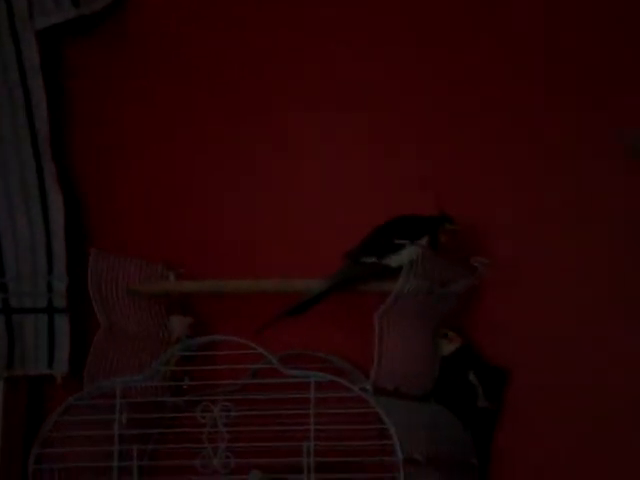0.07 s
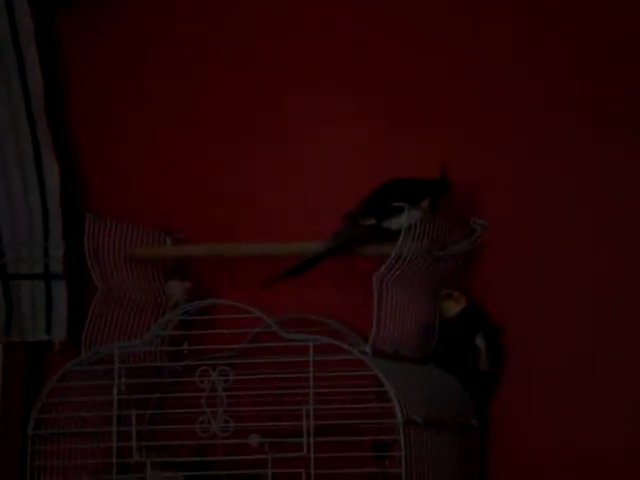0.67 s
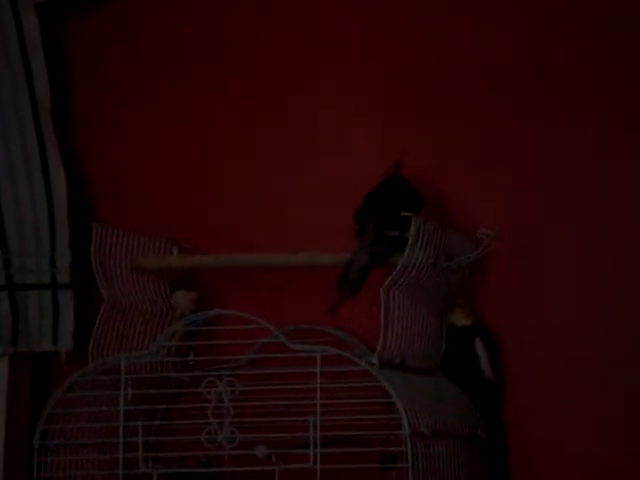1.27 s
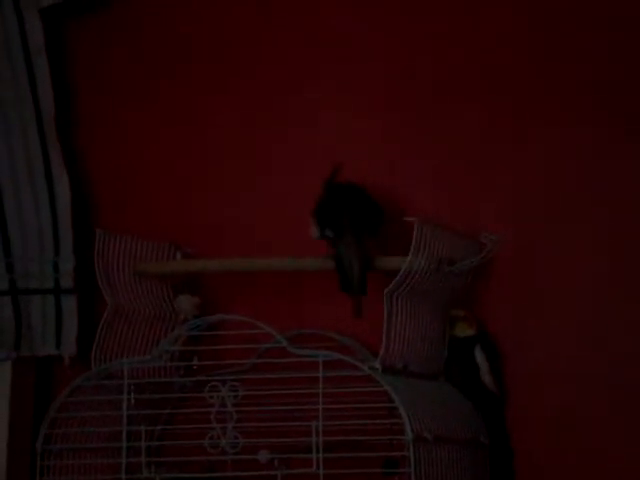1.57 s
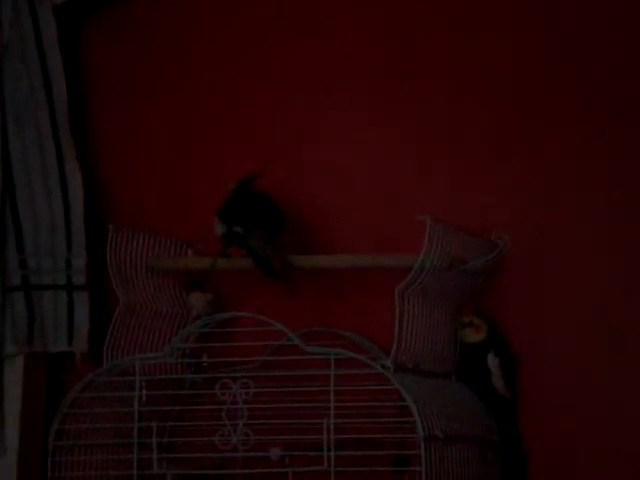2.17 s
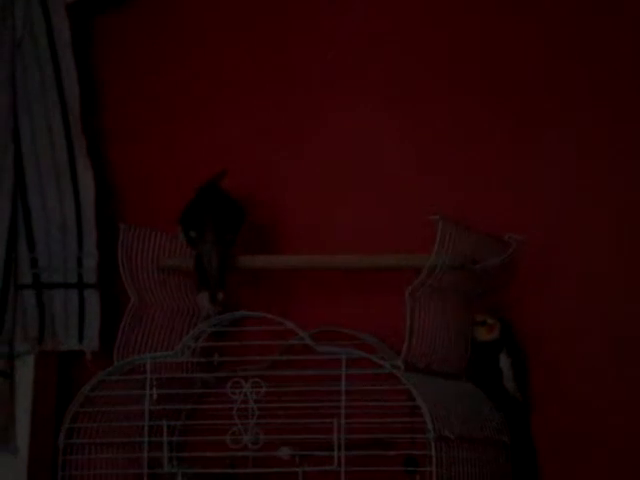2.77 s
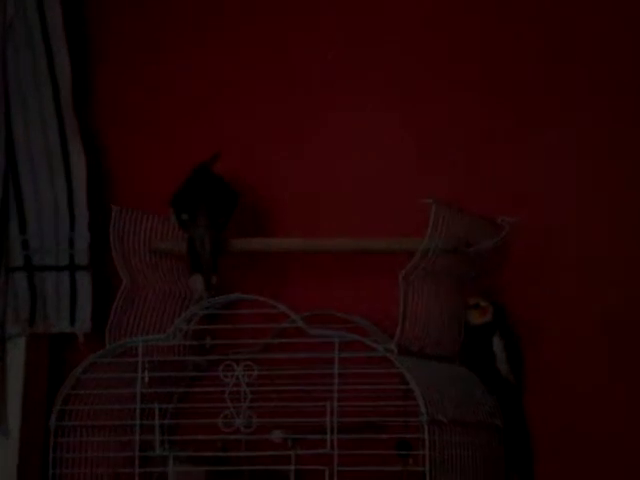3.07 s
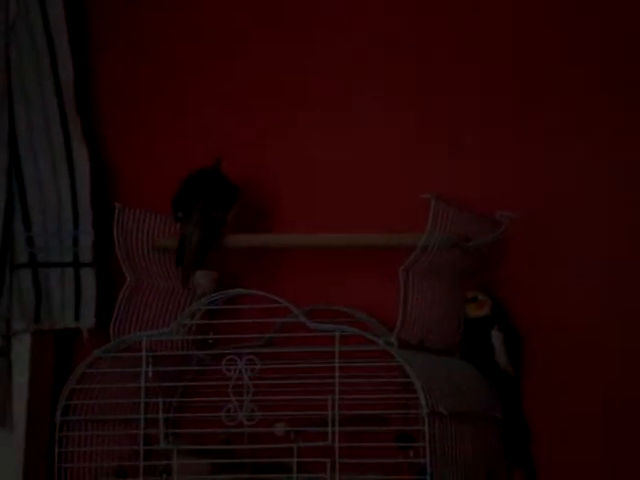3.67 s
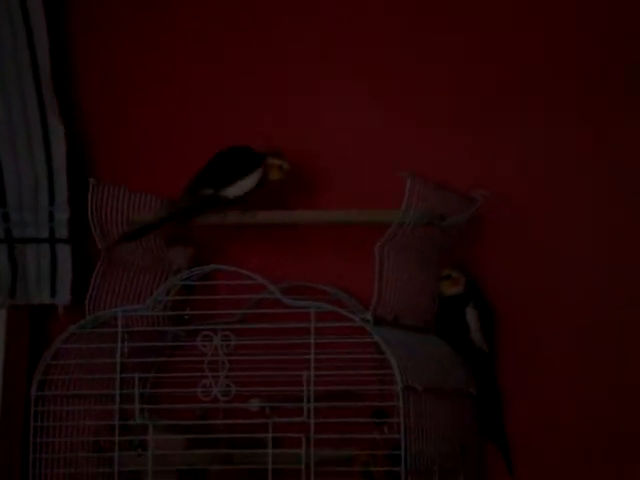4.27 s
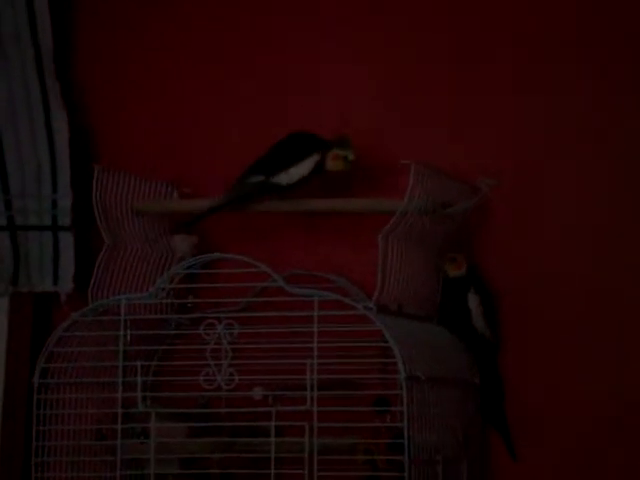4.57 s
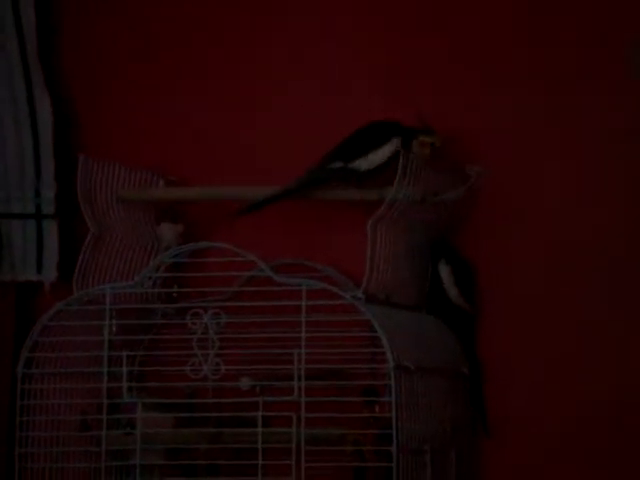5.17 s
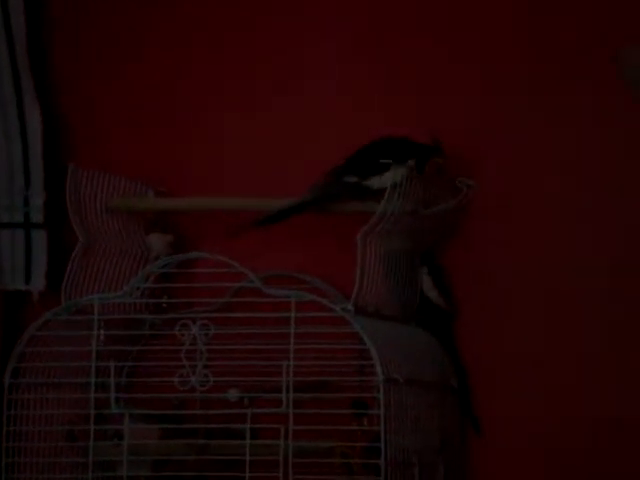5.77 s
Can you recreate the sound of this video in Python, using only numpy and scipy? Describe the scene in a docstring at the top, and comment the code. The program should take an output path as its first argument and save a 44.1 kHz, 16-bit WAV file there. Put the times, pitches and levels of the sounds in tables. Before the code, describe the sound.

A cockatiel scolds in a small quiet room over a low, steady hiss. The raspy tail of a squawk dies away at the start. Short harsh squawks come at about 0.2 and 0.7 seconds, with a quick chirp between them. From 1.4 to 4 seconds the squawks repeat unevenly, often in pairs, each lasting one or two tenths of a second, some tightening into a brief whistle. Feet and feathers scuff softly here and there. At about 4.1 seconds comes the loudest sound, a strained screech that climbs, sinks, climbs again and breaks off downward by 4.5 seconds, briefly overloading the microphone. A chirp follows at 4.7 seconds, a double squawk around 5, another chirp at 5.4 and a last squawk at 5.6. A very faint low hum rises in pitch over the final half second.

```python
"""A cockatiel scolds in short harsh squawks, sidling along its perch in a small quiet room.
Chaotic pulses of its syrinx ring the windpipe and beak; now and then the syrinx locks into a whistle.
Three chirps and one loud screech come between, the screech overloading the microphone.
A squawk's raspy tail dies away at the start; then feet and feathers scuff softly over a low room hiss.
A faint hum rises near the end."""
import sys
import numpy as np
from scipy import signal
from scipy.fft import rfft, irfft, next_fast_len
from scipy.io import wavfile
from scipy.ndimage import uniform_filter1d

SR = 44100
rng = np.random.default_rng(int(sys.argv[2]) if len(sys.argv) > 2 else 0)


def transcribe(signal):
    """Save signal, clipped to [-1, 1], as a 16-bit WAV file at the path in sys.argv[1]."""
    frames = np.atleast_2d(signal).T
    limited = np.clip(frames, -1, 1)
    pcm = np.round(limited * 32767).astype(np.int16)
    wavfile.write(sys.argv[1], SR, pcm)


N = 261072

# syrinx locked within a squawk: t/s, length/s, mid pitch/Hz, drop at ends/fraction, glide/fraction,
# fundamental/dB, overtones/dB
WHISTLES = [ (.185, .08, 1951, .02, -0.035, -35, -35), (1.41, .078, 2070, .14, -.08, -36, -27.5),
            (1.515, .104, 1615, .16, .07, -35.5, -30.5),
            (2.425, 0.047, 1520, -0.027, -0.0595, -32.5, -32.5), (2.47, 0.0482, 1630, .04, 0.037, -28, -28),
            (2.869, 0.0895, 1305, -.04, -0.094, -35.5, -44.5),
            (3.343, 0.0332, 1348, -0.067, -0.029, -30.5, -44), (3.372, .048, 1533, .11, -0.049, -33, -38.5),
            (3.885, 0.0998, 1480, -.03, .16, -37.5, -45), (5.01, 0.114, 1690, 0, -0.0034, -52.5, -33.5),
            (5.118, 0.0851, 1574, -.01, 0.0625, -30, -32.5), (5.613, 0.047, 1850, 0, -.01, -45.5, -31.5)]
# half-open beak, overtone response: f/Hz, gain/dB
HALF_OPEN_BEAK = [(2500, 9), (3300, 3), (4100, 2.5), (4900, 5), (5700, -6), (6600, -1.5), (7500, -12),
                  (9500, -25.5)]


def gain_of(db):
    """Decibels to amplitude."""
    return 10 ** (np.asarray(db) / 20)


def unit_rms(x):
    """Scale to rms 1."""
    return x / np.sqrt(np.mean(x ** 2) + 1e-20)


def lookup(points, hz):
    """Interpolate a table over log frequency."""
    f, value = np.transpose(points)
    return np.interp(np.log(hz + 1), np.log(f + 1), value)


def add(mix, start_s, sound):
    """Mix a sound in at start_s."""
    part = mix[max(round(start_s * SR), 0):][:len(sound)]
    part += sound[:len(part)]


def span(start_s, length_s):
    """Sample times and progress 0-1."""
    t = np.arange(0, length_s, 1 / SR)
    return start_s + t, t / length_s


def shaped(x, gain):
    """Filter by gain(f); rms 1."""
    size = next_fast_len(2 * len(x))
    spectrum = rfft(x, size) * gain(np.fft.rfftfreq(size, 1 / SR) + 1)
    return unit_rms(irfft(spectrum, size)[:len(x)])


def below(f, edge_hz):
    """Steep low-pass gain."""
    return 1 / (1 + (f / edge_hz) ** 20)


def wobble(count, rate_hz):
    """Smooth noise up to rate_hz; rms 1."""
    return shaped(rng.standard_normal(count), lambda f: 1 / (1 + (f / rate_hz) ** 4))


def fades(t, edge_s):
    """Linear ramps at both ends."""
    return np.clip(np.minimum(t - t[0], t[-1] - t) / edge_s, 0, 1)


def resonate(x, hz, width_hz):
    """Resonance tracking the curve hz."""
    carrier = np.exp(2j * np.pi * np.cumsum(hz) / SR)
    pole = np.exp(-np.pi * width_hz / SR)
    return 2 * (carrier * signal.lfilter([1 - pole], [1, -pole], x / carrier)).real


def hiss(level_db=-55.4, drift_db=1.54):
    """Room and microphone noise, drifting slightly in level."""
    # noise spectrum: f/Hz, relative level/dB
    spectrum = [(15, -55.5), (25, -19.5), (85, -13.5), (190, -4), (663, 0), (1300, -4), (1590, -6),
                (2040, -7.5), (2320, -9), (2980, -9), (3550, -12.5), (3920, -13.5), (4330, -13),
                (5420, -12.5), (9890, -15), (12900, -51.5), (21800, -120)]
    noise = shaped(rng.standard_normal(N), lambda f: gain_of(lookup(spectrum, f)))
    return gain_of(level_db + drift_db * wobble(N, 3.4)) * noise


def room(x, wet_db=-7.0, build_s=0.0044):
    """Direct sound, wall echoes and a short tail whose treble dies first."""
    # reverberation time: f/Hz, t60/s
    decay = [(300, 0.5), (2000, 0.2884), (4000, 0.3384), (8000, 0.204)]
    # wall echoes: delay/s, relative gain
    walls = [(.0023, -0.012), (.0052, -0.027), (.0094, 0.174), (0.0135, 0.21), (0.0227, 0.195)]
    hz, t, bins = signal.stft(rng.standard_normal(SR // 2), SR, nperseg=256)
    tail = signal.istft(bins * gain_of(-60 * t / lookup(decay, hz)[:, None]), SR, nperseg=256)[1]
    tail *= 1 - np.exp(-np.arange(len(tail)) / SR / build_s)
    response = gain_of(wet_db) * tail / np.linalg.norm(tail)
    direct = (0.00016, 0.876)
    for delay_s, gain in [direct] + walls:
        add(response, delay_s, np.array([gain]))
    return signal.fftconvolve(x, response / np.linalg.norm(response))[:N]


def hum(mix):
    """Faint low tone and its octave, drifting upward."""
    # tone: t/s, length/s, mid pitch/Hz, glide/fraction, level/dB
    note = (5.5, .5, 228.5, 0.23, -64)
    start_s, length_s, hz, glide, level_db = note
    t, u = span(start_s, length_s)
    pitch_hz = hz * (1 + glide * (u - .5) + .015 * wobble(len(t), 9.5))
    phase = 2 * np.pi * np.cumsum(pitch_hz) / SR
    tone = np.sin(phase) + 0.42 * np.sin(2 * phase)
    add(mix, start_s, gain_of(level_db) * tone * fades(t, 0.041))


def squawk_tail_and_scuffs(mix, grain_db=1.5, rise=0.099):
    """A squawk's raspy tail dying away at the start, then soft scuffs of feet and feathers."""
    # grainy noise bursts: t/s, decay time/s, level/dB, centre/Hz, width/octaves
    bursts = [(0, 0.031, -38.5, 2283, 0.743), (0.021, 0.226, -50.5, 2040, 0.457),
              (0.02, 0.228, -46, 516, 0.875), (0.035, 0.257, -57.5, 223.5, 0.226),
              (0.168, 0.192, -51.5, 584.6, 0.083), (0.44, 0.035, -56, 295.6, 0.54),
              (0.741, 0.0558, -49.5, 389.6, 0.25), (0.9, 0.058, -47, 1227, 0.36),
              (1.132, 0.0342, -43.5, 972, 1.18), (1.135, 0.0384, -49, 393, 0.264),
              (1.232, 0.0228, -51.5, 503, 0.93), (1.887, 0.0713, -47, 376.6, 0.391),
              (2.33, 0.0823, -56, 269, 0.846), (3.038, 0.1032, -45.5, 2714, 1.28),
              (3.457, 0.211, -50, 2847, 1.154), (3.511, 0.041, -46.5, 2000, 1.48),
              (5.071, 0.287, -60.5, 282, 0.507), (5.835, 0.07, -54, 3040, 2.2)]
    for start_s, decay_s, level_db, hz, octaves in bursts:
        t = np.arange(0, 1.3 * decay_s, 1 / SR)
        grains = rng.standard_normal(len(t)) * gain_of(grain_db * wobble(len(t), 150))
        band = shaped(
            grains, lambda f: np.exp(-.5 * (np.log2(f / hz) / octaves) ** 2) * np.sqrt(hz / (f + hz)))
        envelope = fades(t, rise * decay_s) * np.exp(-(t / decay_s) ** 3)
        add(mix, start_s, gain_of(level_db) * band * envelope)


def syrinx_tone(t, hz, first_db, upper_db, beak, jitter, shimmer_db, fuzz_db, octave_db, trim_db):
    """The syrinx swings at one trembling pitch; higher harmonics fray more."""
    count = len(t)
    # the tone roughens as the bird pushes
    strain = gain_of(0.33 * (first_db - first_db.max()))
    phase = 2 * np.pi * np.cumsum(hz * (1 + jitter * strain * wobble(count, 350))) / SR
    tone = np.zeros(count)
    for k in range(1, 6):
        level_db = first_db if k == 1 else upper_db + octave_db * np.log2(k - 1) + lookup(beak, k * hz)
        fuzz, fray_hz = gain_of(fuzz_db) * strain * k, 380 * np.sqrt(k)
        harmonic = (1 + fuzz * wobble(count, fray_hz)) * np.sin(k * phase)
        harmonic += fuzz * wobble(count, fray_hz) * np.cos(k * phase)
        tone += gain_of(level_db) * unit_rms(harmonic)
    return gain_of(trim_db + shimmer_db * wobble(count, 170)) * tone * fades(t, 0.00432)


def chirps(mix, sag_hz_per_s=2670, fade_db_per_s=194.5):
    """Short syrinx notes that start strong, then sag and fade."""
    # chirps: t/s, length/s, start pitch/Hz, fundamental/dB, overtones/dB
    notes = [(.492, 0.0317, 2009, -30.5, -30.5), (4.732, 0.0268, 2031, -29, -32),
             (5.432, 0.0273, 1960, -30, -33.5)]
    for start_s, length_s, hz, first_db, upper_db in notes:
        t, _ = span(start_s, length_s)
        pitch_hz = hz - sag_hz_per_s * (t - start_s)
        fade_db = fade_db_per_s * (t - start_s)
        tone = syrinx_tone(t, pitch_hz, first_db - fade_db, upper_db - fade_db, HALF_OPEN_BEAK,
                           jitter=.025, shimmer_db=4.0, fuzz_db=-16.5, octave_db=-12, trim_db=-2.2)
        add(mix, start_s, tone)


def screech(mix):
    """Strained cry through the wide-open beak: climbs, sinks, climbs, breaks off downward."""
    # cry contour: t/s, pitch/Hz, fundamental/dB, overtones/dB
    contour = [(4.136, 1410, -37.5, -35), (4.185, 1746, -22.5, -25), (4.207, 1915, -17, -22.5),
               (4.24, 2257, -18, -29), (4.25, 2512, -11.3, -21), (4.268, 2440, -13.4, -22.8),
               (4.286, 2080, -18.3, -26), (4.32, 1875, -21, -26), (4.374, 2085, -27.5, -34.5),
               (4.405, 1869, -23, -20), (4.428, 1987, -18, -34.5), (4.44, 2259, -22.5, -23),
               (4.462, 2340, -16, -22.5), (4.473, 1800, -19, -13.8), (4.481, 1550, -27, -19)]
    # wide-open beak, overtone response: f/Hz, gain/dB
    wide_open_beak = [(2800, 1), (3700, 0.5), (4600, 3), (5300, -2.5), (6100, -2.5), (7100, -15),
                      (8200, -8.5), (9500, -35.5)]
    times_s, *columns = np.transpose(contour)
    t = np.arange(times_s[0], times_s[-1], 1 / SR)
    pitch_hz, first_db, upper_db = (np.interp(t, times_s, column) for column in columns)
    tone = syrinx_tone(t, pitch_hz, first_db, upper_db, wide_open_beak,
                       jitter=.032, shimmer_db=1.3939, fuzz_db=-13.7, octave_db=-3.3, trim_db=-1.7)
    add(mix, t[0], tone)


def whistles(mix, waver=.008):
    """The locked syrinx arches, glides and wavers in pitch; weaker and duller at the ends."""
    for start_s, length_s, hz, arch, glide, first_db, upper_db in WHISTLES:
        t, u = span(start_s, length_s)
        ends = (2 * u - 1) ** 2
        pitch_hz = hz * (1 - arch * ends + glide * (u - .5) + waver * wobble(len(t), 45.43))
        tone = syrinx_tone(t, pitch_hz, first_db - 3 * ends, upper_db - 11 * ends, HALF_OPEN_BEAK,
                           jitter=0.02257, shimmer_db=2.5, fuzz_db=-19.5, octave_db=-5, trim_db=-2.5)
        add(mix, start_s, tone)


def locking(t, grip_s=0.0227):
    """Syrinx state: 0 rattling freely, 1 holding a pitch."""
    held = sum(np.clip(np.minimum(t - start_s, start_s + length_s - t) / grip_s, 0, 1)
               for start_s, length_s, *_ in WHISTLES)
    return np.minimum(held, 1)


def syrinx_rattle(count, rate_hz=1150, jitter=.3, air=0.348, flutter_db=2.1):
    """Chaotic pulses plus breath noise, in uneven clumps."""
    # voice colour: f/Hz, gain/dB
    colour = [(250, -43.5), (700, -14), (1020, -6.5), (1450, -8), (1850, -3.5), (2200, -4.5), (3300, -10.5),
              (4250, -6.5), (4950, -5), (5500, -9), (6200, -22), (6900, -21), (7550, -21), (9000, -35.5)]
    cycles = np.cumsum(rate_hz * np.exp(jitter * wobble(count, 700))) / SR
    pulses = np.diff(np.floor(cycles), prepend=0)
    drive = unit_rms(pulses - pulses.mean()) + air * rng.standard_normal(count)
    drive *= gain_of(flutter_db * wobble(count, 250))
    return shaped(drive, lambda f: gain_of(lookup(colour, f)))


def vocal_tract(voice, low_hz, pipe_hz, spread):
    """Three bands of rms 1, ringing the low resonance, the windpipe and the beak."""
    low = shaped(voice, lambda f: below(f, 2240))
    low += 1.4 * resonate(low, low_hz, width_hz=380)
    middle = shaped(voice, lambda f: below(f, 3963) - below(f, 2328))
    ring = resonate(resonate(middle, pipe_hz, width_hz=600), pipe_hz, width_hz=600)
    pipe = unit_rms(ring) + 0.92 * spread * middle
    treble = shaped(voice, lambda f: 1 - below(f, 3884))
    stretch = pipe_hz / 3500  # beak resonances follow the windpipe a little
    beak = treble + 0.73 * resonate(treble, 4800 * stretch ** 0.17, width_hz=330)
    beak += 1.93 * resonate(treble, 7600 * stretch ** 0.094, width_hz=330)
    return unit_rms(low), unit_rms(pipe), unit_rms(beak)


def squawks(mix, ease_db_per_s=100, surge_db=.5, wander=.014, low_sag=0.044, spread_s=0.013):
    """The rattle swells and eases while the windpipe glides; the opening beak lets out the treble."""
    # syllables: t/s, length/s, crest effort/dB, swell/dB, crest position/fraction, windpipe start/Hz,
    # windpipe end/Hz, low band/dB re effort, low resonance/Hz, beak band/dB re effort
    syllables = [ (.176, .102, -28, 6, .3, 3856, 3960, -2.5, 1900, 3),
                 (.650, 0.1314, -27.5, 9, 0.16, 3175, 3048, -3.5, 1650, -7),
                 (1.398, 0.1066, -27.5, 8, .13, 3420, 3970, -6, 2000, -3),
                 (1.505, 0.173, -34.5, -7, .15, 3504, 3230, -4, 1500, -6),
                 (1.816, 0.0972, -28.2, 4, .55, 3350, 3780, -6.5, 2000, -.5),
                 (2.159, 0.1367, -25.5, 8.5, 0.66, 3553, 2500, -10.5, 1850, -9),
                 (2.296, 0.232, -27.3, 6, 0.72, 3280, 3170, -6.5, 1600, -12),
                 (2.725, 0.121, -29, 3.5, 0.75, 3483, 2890, -9, 1900, -9),
                 (2.839, 0.1288, -34, 2, 0.73, 2860, 2480, -5.5, 1380, -28.5),
                 (3.22, .127, -29.5, 3.5, 1, 3655, 2420, -9, 1900, -7.5),
                 (3.345, 0.089, -34, -2, 0.33, 2744, 2845, -4.5, 1420, -19),
                 (3.647, 0.1493, -27.3, 9.5, .45, 3300, 3650, -8.5, 1830, -8),
                 (3.814, 0.1821, -22.5, 17, .57, 3480, 3720, -7.5, 1700, -7.5),
                 (4.891, .140, -31, -1, 1, 3660, 3560, -7, 1830, -2.5),
                 (5.030, 0.1703, -25, 1.5, 0.86, 3350, 3553, -5, 1565, -6.5),
                 (5.606, 0.1059, -25.5, 5, 0.97, 3844, 3043, -9, 1980, -5.5)]
    for (start_s, length_s, crest_db, swell_db, crest,
         from_hz, to_hz, low_db, low_hz, beak_db) in syllables:
        t, u = span(start_s, length_s)
        effort_db = crest_db - swell_db * np.maximum(1 - u / crest, 0)
        effort_db -= ease_db_per_s * length_s * np.maximum(u - crest, 0)
        effort_db += surge_db * wobble(len(t), 50)
        pipe_hz = (from_hz + (to_hz - from_hz) * u) * (1 + wander * wobble(len(t), 40))
        sagging_hz = low_hz * (1 - low_sag * (u - .5))
        spread = np.minimum((t - start_s) / spread_s, 1)  # windpipe first, then the rasp around it
        low, pipe, beak = vocal_tract(syrinx_rattle(len(t)), sagging_hz, pipe_hz, spread)
        growth_db = 3.5 * (u - .5)
        pop_db = 3 * np.exp(-(t - start_s) / .007)  # first puff of air
        shut_db = -2.5 * (2 * u - 1) ** 2
        lock = locking(t)  # a held pitch takes energy from the rattle
        low *= gain_of(low_db - 2.5 + growth_db - 7 * lock)
        pipe *= gain_of(-1.1 + pop_db - 7 * lock)
        beak *= gain_of(beak_db - 1.1 + shut_db - 5 * lock)
        rasp = pipe + spread * (low + beak)
        add(mix, start_s, gain_of(effort_db) * rasp * fades(t, 0.0024))


def scene():
    """Calls, scuffs and hum in the room, over hiss; mono."""
    near = np.zeros(N)
    for source in squawks, whistles, chirps, squawk_tail_and_scuffs, screech, hum:
        source(near)
    return (room(near) + hiss())[None]


def record(dry, ceiling=.47, overload=.4, crackle_db=-12, edge_hz=10020):
    """The microphone clips and crackles on the loudest peaks; then a band limit."""
    overload_share = uniform_filter1d((abs(dry) > overload) * 1., 40)
    noise = shaped(rng.standard_normal(N), lambda f: 1 / (1 + (f / 3500) ** 2))
    crackle = gain_of(crackle_db) * overload * np.sqrt(abs(overload_share)) * noise
    distortion = np.clip(dry, -ceiling, ceiling) - dry + crackle
    bass_cut = signal.butter(2, 160, "highpass", fs=SR, output="sos")
    heard = dry + signal.sosfilt(bass_cut, distortion)
    band_limit = signal.firwin(1023, edge_hz, window=("kaiser", 9), fs=SR)
    return signal.oaconvolve(heard, band_limit[None], "same")


dry = scene()
out = record(dry)
transcribe(out)
```